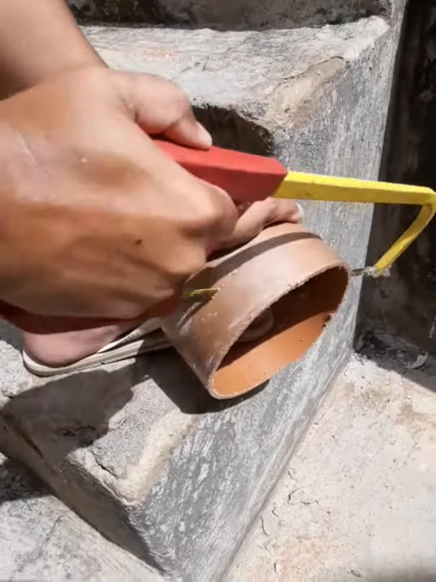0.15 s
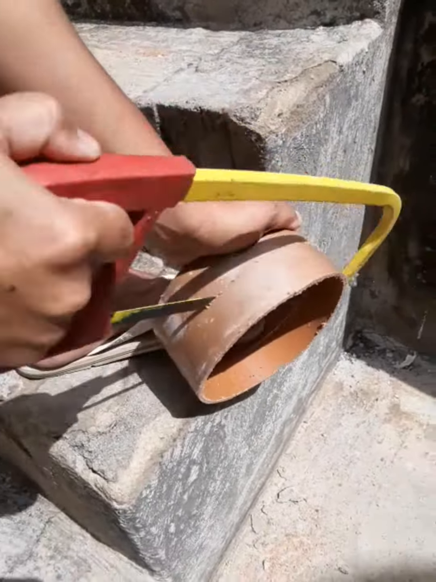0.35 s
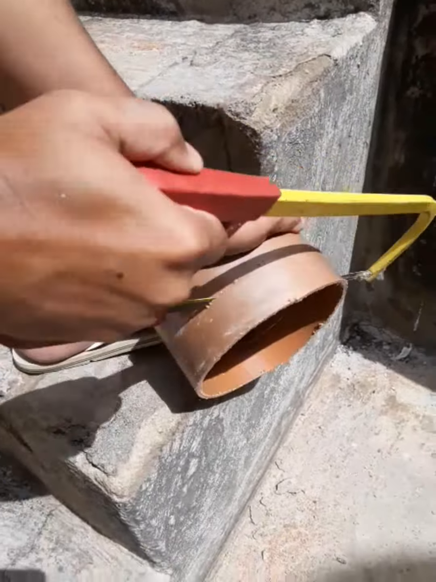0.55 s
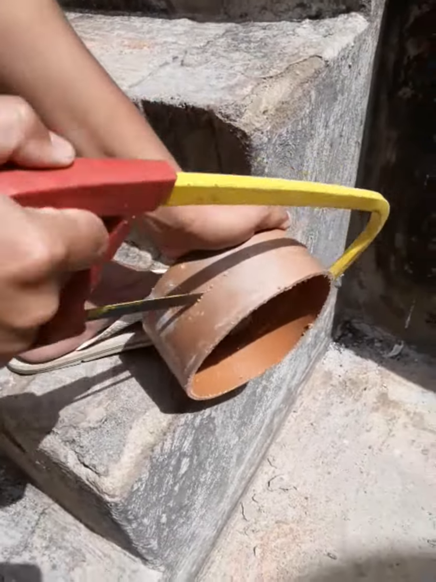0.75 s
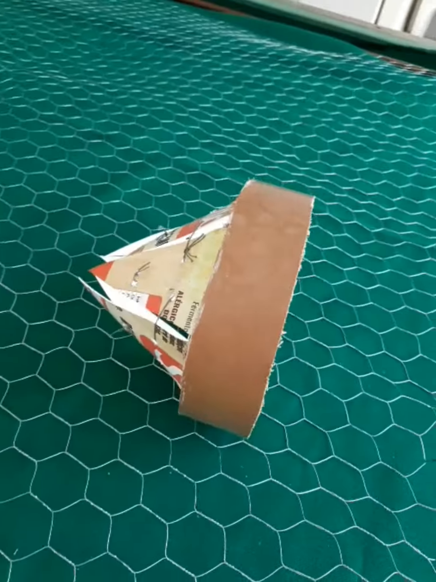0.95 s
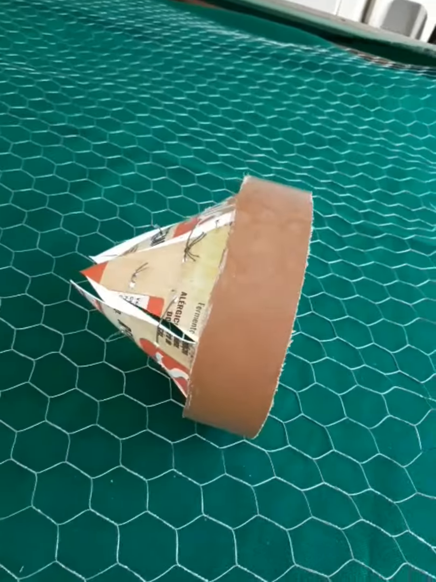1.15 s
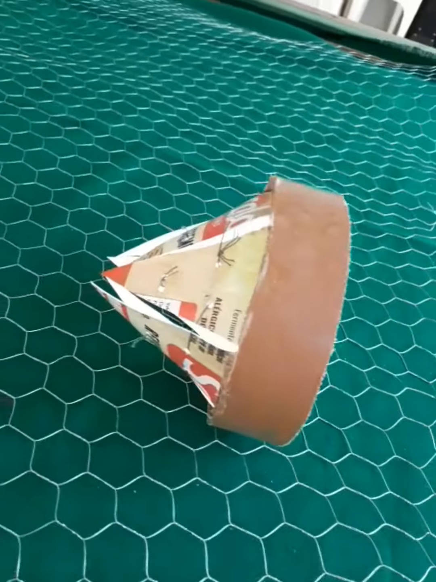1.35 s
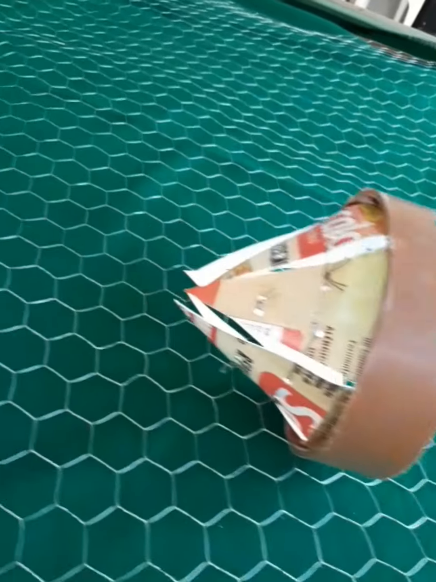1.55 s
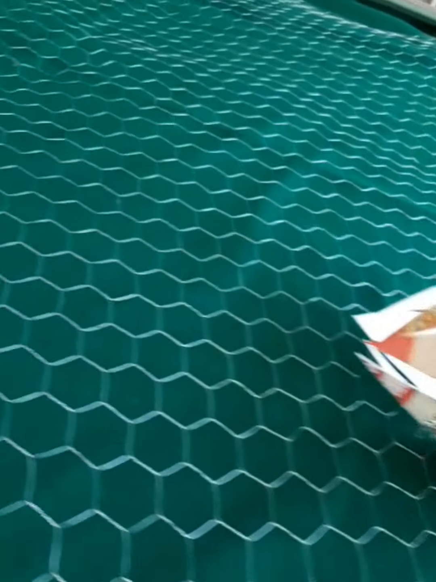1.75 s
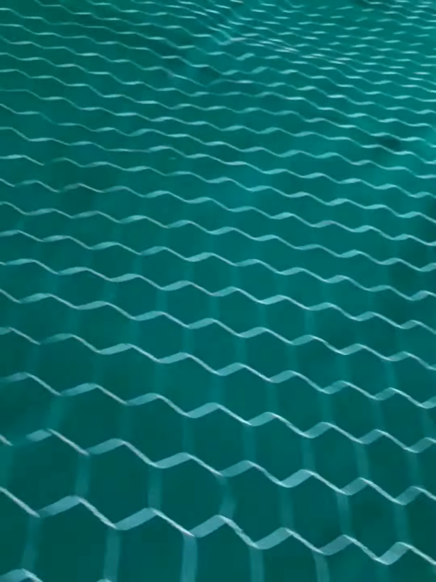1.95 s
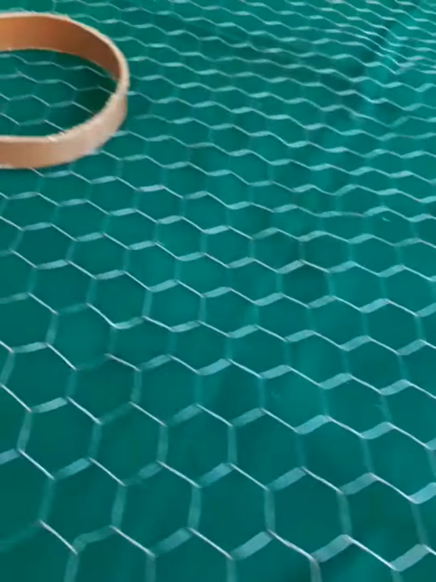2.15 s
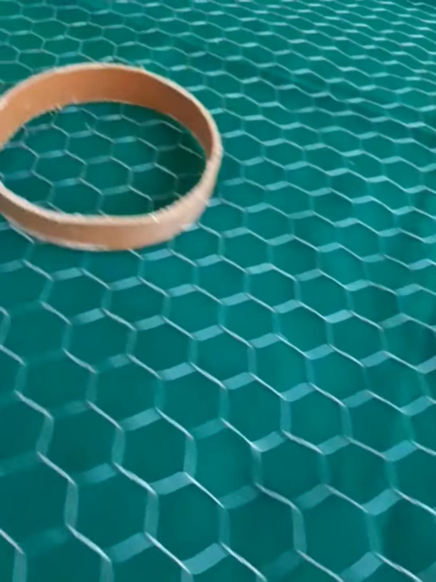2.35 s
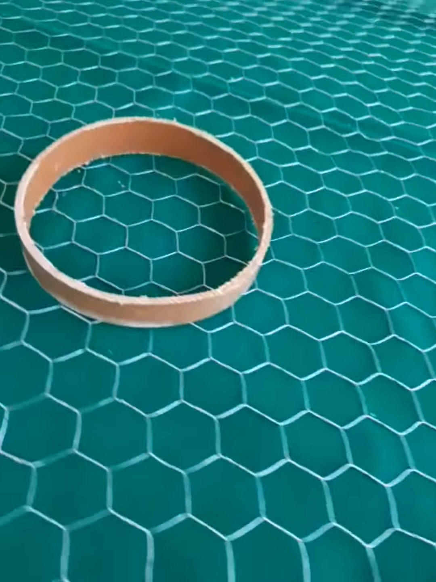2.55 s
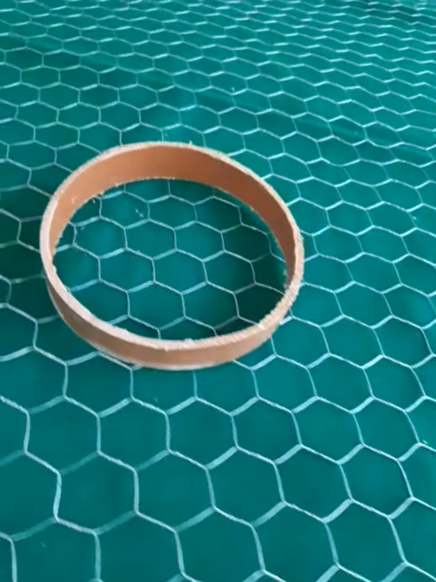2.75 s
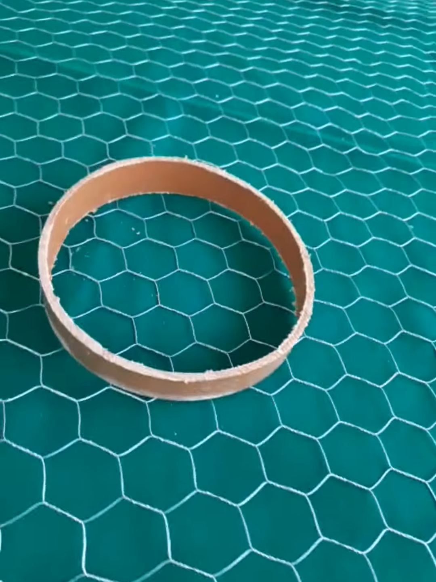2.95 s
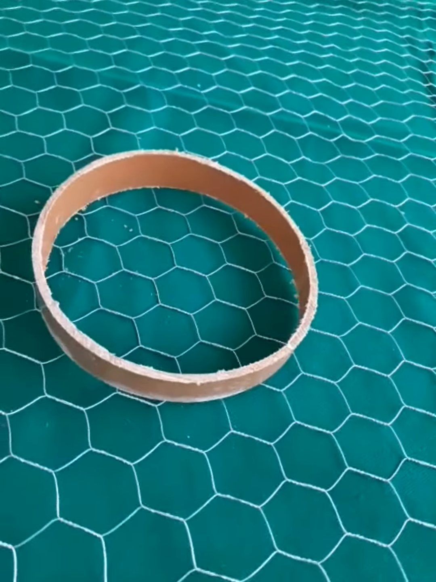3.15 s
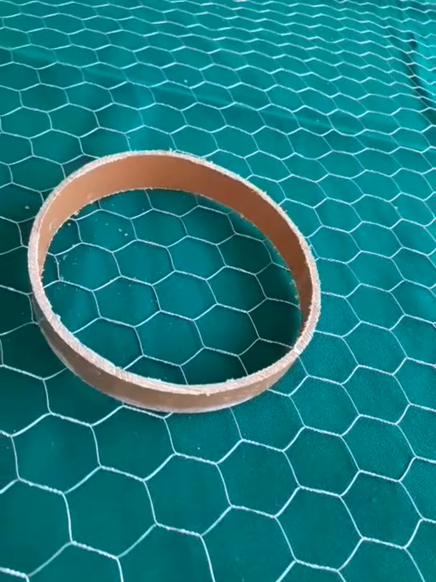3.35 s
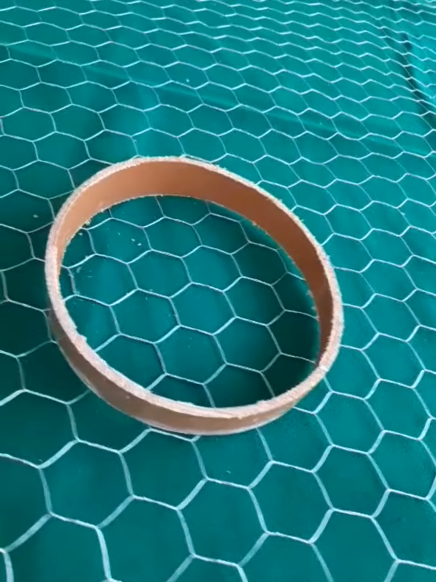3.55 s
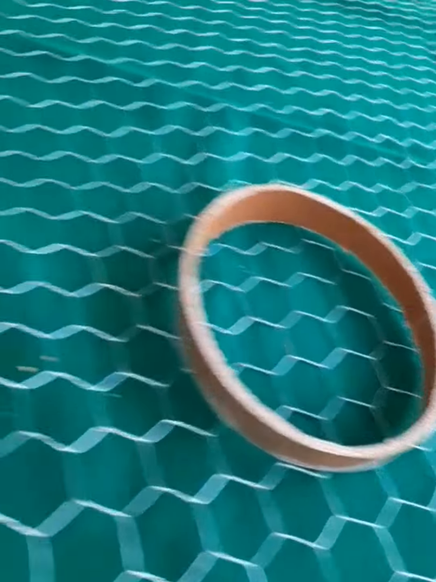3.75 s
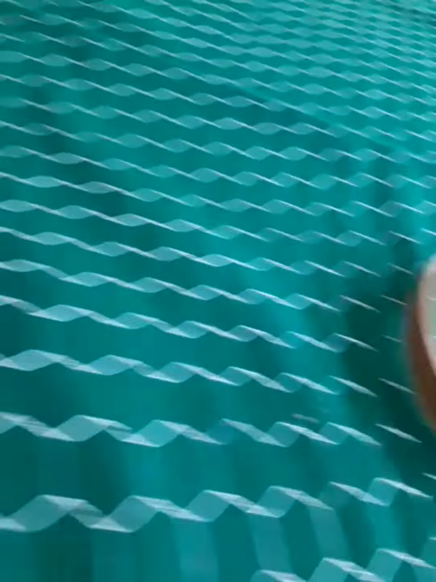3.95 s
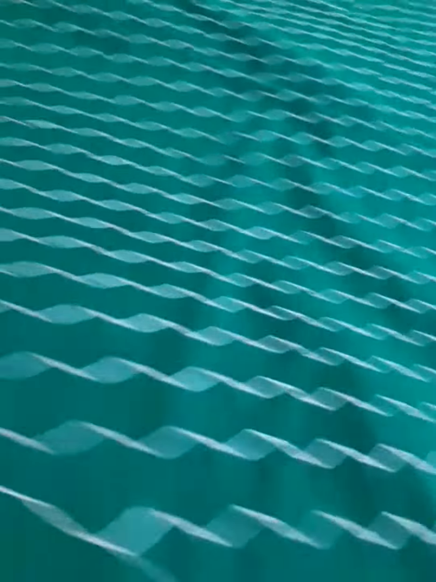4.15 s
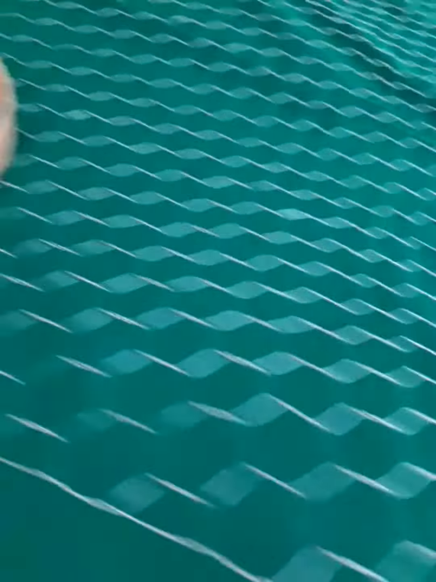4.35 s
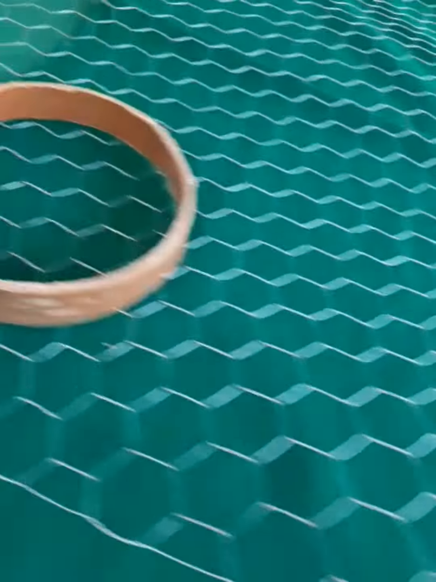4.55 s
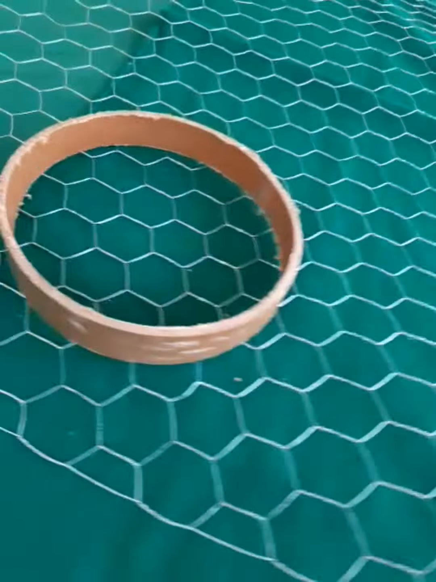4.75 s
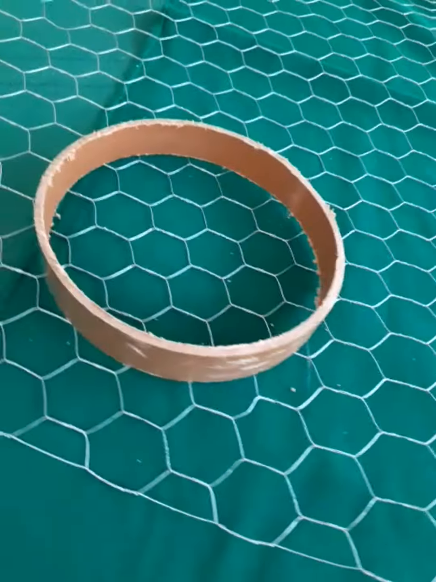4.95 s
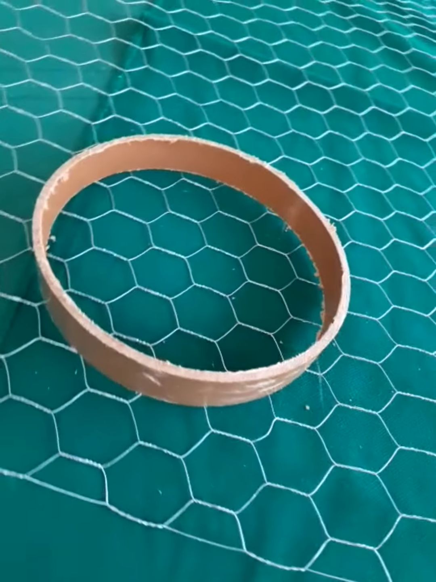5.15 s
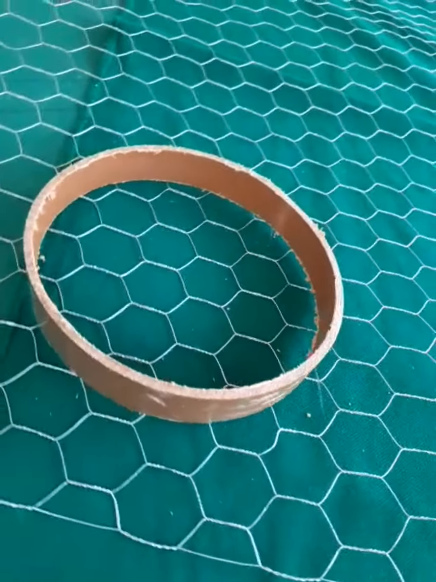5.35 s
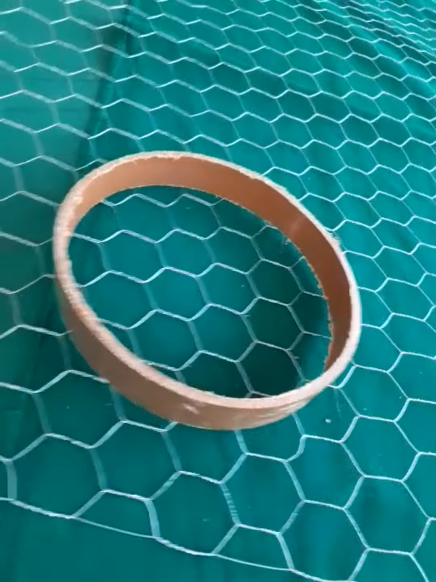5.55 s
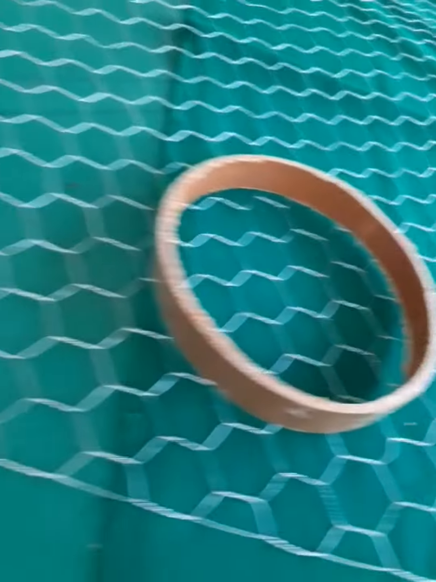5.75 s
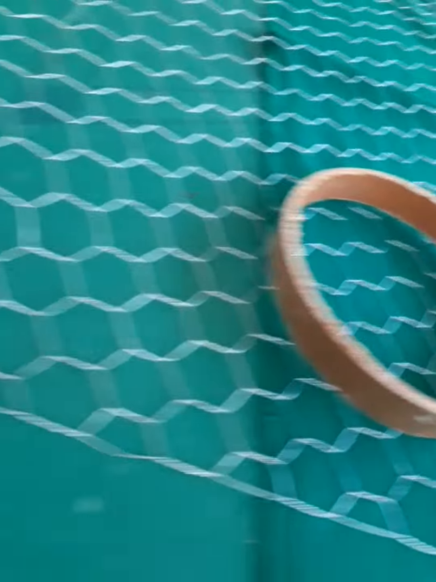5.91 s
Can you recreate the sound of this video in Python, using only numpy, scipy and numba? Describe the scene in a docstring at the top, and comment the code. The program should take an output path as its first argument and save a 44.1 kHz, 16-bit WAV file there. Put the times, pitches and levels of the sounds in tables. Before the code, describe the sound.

A hand hacksaw cuts a plastic pipe close to the microphone outdoors: three quick, ringing rasps that rise and fall in pitch, with soft puffs of wind. After a split second of silence the sawing continues, quieter and further off in an echoing yard, in steady strokes. A low coo throbs beneath it. The saw pauses, a small bird chirps faintly, and the sawing starts again. A soft rumble lies underneath.

```python
"""First you hear a hacksaw cutting a short plastic pipe, close by and outdoors. After a brief silence the
sawing goes on further off in an echoing yard, with a pause. The teeth strike the pipe and make pipe and
blade ring; the faster the blade moves, the higher the note. Wind stirs around the close sawing, a low coo
throbs and a small bird chirps in the yard, and a soft rumble lies under both."""
import sys
import numpy as np
from scipy import signal
from scipy.fft import rfft, irfft
from scipy.io import wavfile
from scipy.ndimage import uniform_filter1d
from numba import njit

SR = 44100
rng = np.random.default_rng(int(sys.argv[2]) if len(sys.argv) > 2 else 0)


def log_audio(samples):
    """Write samples as a 16-bit WAV file to the path given in sys.argv[1]."""
    # one column per channel
    frames = np.atleast_2d(samples).T
    # limit to full scale, then quantise
    limited = np.clip(frames, -1, 1)
    pcm = np.round(limited * 32767).astype(np.int16)
    wavfile.write(sys.argv[1], SR, pcm)


N = 268128

# Blade speed, one list for each close push. Each row: time in seconds, teeth striking per second.
PUSH_SPEEDS = [
    [(0, 767.5), (.015, 1033), (.032, 1289), (.052, 1349), (.066, 1164), (.082, 840), (.1, 597)],
    [(.365, 480), (.39, 741.5), (.408, 1065), (.424, 1253), (.446, 1284), (.46, 1038), (.48, 657)],
    [(.784, 636), (.81, 920), (.83, 1190), (.85, 1345), (.864, 1201), (.878, 1040)],
]
# Each close push at full speed. Each row: tooth note in dB, overtones against the rasp in dB.
PUSH_TONES = [(-24, -4), (-22.5, -9), (-25.5, -4)]
# Close strokes, loud pushes and light pulls. Each row: start, rise and hold in seconds, peak and swell
# in dB, fade in dB per second, high hiss and knock in dB, fade of the ringing in dB per second.
NEAR_STROKES = [(0, 0.058, 0.028, -16.5, 5, 700, -20.5, -48.5, 132),
                (0.168, 0.042, 0.015, -27.5, 8.5, 350, -22.5, -44.5, 151),
                (0.243, 0.019, .006, -24, 9, 282, -22.5, -44.5, 169),
                (.361, 0.073, 0.033, -15.5, 15, 800, -20, -43.5, 126),
                (0.579, 0.08, 0.0055, -25.5, 6, 302, -21, -46, 194),
                (0.777, 0.093, .02, -18, 7.5, 405, -18.5, -52, 150)]
# Far strokes. Each row: start, rise and hold in seconds, peak and swell in dB, fade in dB per second,
# middle of the pull back in seconds, its level in dB, teeth per second, tooth note and second harmonic
# in dB, blade ring in Hz, blade ring in dB, third harmonic in dB, high hiss in dB.
FAR_STROKES = [(0.925, 0.0025, 0.0089, -60, 1, 60, 1.03, -62, 1230, 14, -14, 3250, 1, -15, -22),
               (1.031, 0.067, 0.009, -34.5, 15, 125, 1.3, -51.5, 1380, 3, -12, 3320, 7.5, -16, -19),
               (1.419, 0.051, .01, -36, 12, 111, 1.72, -49, 1286, -0.5, -26, 3130, -3, -24, -20),
               (1.816, 0.063, 0.029, -34.5, 13, 103, 2.05, -52, 1457, 3, -18, 3260, 4, -9, -20.5),
               (2.211, 0.071, 0.027, -38.5, 14, 152, 2.53, -48.5, 1416, -8, -15, 3160, 1, 0.5, -21),
               (2.602, 0.078, 0.0036, -32, 13.5, 113, 2.85, -48, 1483, 1, -13, 3240, 2, -13, -19.5),
               (2.998, 0.053, 0.026, -34.5, 10, 99, 3.24, -53.5, 1360, 3.5, -9, 3280, -4, -2, -21),
               (3.347, 0.099, 0.0057, -32, 20, 106, 3.65, -50, 1380, 0.5, -30, 3200, -1.5, -8, -20.5),
               (3.727, 0.071, 0.024, -32.5, 20, 100, 3.97, -47.5, 1398, -0.5, -18, 3300, -21, 0, -21.5),
               (4.095, 0.089, 0.0068, -33.5, 15.5, 116, 4.42, -58, 1010, -6.5, -36, 3130, -3, -3, -19),
               (4.514, 0.015, .06, -61, 2, 58.5, 3.9, -73, 1450, -18, -21, 3200, -12, -5.5, -10.5),
               (4.693, .03, 0.0092, -52.5, 8, 181, 4.9, -78.5, 1390, -22, -12, 3140, 15, -7, -13),
               (5.213, 0.013, .02, -62, 8, 42, 5.32, -75, 1480, -15, -11, 3180, -5, -12, -10),
               (5.352, .012, .02, -53.5, 8, 46, 5.57, -61.5, 1480, -13, -13, 3230, -12, -10, -24),
               (5.677, 0.038, 0.067, -40, 8, 105, 5.93, -50, 1140, -7.5, -6, 3280, -2, -15, -24),
               (6.058, .03, .01, -50, 7, 100, 6.2, -60, 1310, 5, 1, 3230, -3, -10, -21)]
# Overtones of the close tooth note. Each row: multiple of the tooth rate, level in dB.
NEAR_OVERTONES = [(2, -1.5), (3, -6.5), (4, -6.0), (5, -1.0), (6, -9.0)]
# The far tooth note and its overtones. Each row: multiple of the tooth rate, band width in Hz.
FAR_BANDS = [(1, 270), (2, 330), (3, 480)]
# Where pipe and blade like to ring. Each row: pitch in Hz, width in Hz, relative strength in dB.
NEAR_RESONANCES = [(661, 200, -16), (1043, 130, -3.5), (1190, 200, -4), (1640, 220, -4), (2203, 220, -12),
                   (2864, 250, 3.5), (3120, 460, -4.5), (3423, 73, -6.5), (4044, 770, -3), (5140, 210, -3),
                   (6440, 1100, -17.5)]
FAR_RESONANCES = [(933, 2750, -3), (2010, 103, -4), (2782, 1050, -6), (4318, 260, 2), (4640, 820, -3),
                  (6920, 2100, -1)]
# Tone colour of the rasp and of its high hiss. Each row: frequency in Hz, relative level in dB.
NEAR_RASP_COLOUR = [(240, -50.5), (400, -28.5), (663, -10.5), (884, -9.5), (1100, -9), (2430, -12),
                    (3030, 3), (3770, -10), (6330, -5), (10500, -37.5), (13600, -63), (22000, -120)]
FAR_RASP_COLOUR = [(260, -5), (450, -21), (885, -11.5), (1510, -2), (2390, -14.5), (3250, 0.5), (7080, -22),
                   (9500, -25), (12400, -37), (20900, -120)]
HISS_COLOUR = [(5000, -37), (8500, -23.5), (9320, -21), (10800, -2), (11700, -3.5), (15100, 0.5),
               (16000, -4.5)]
# The blade snags on its way back. Each row: start in seconds, level in dB, ring time in seconds.
SNAGS = [(0.246, -29, 0.0079), (0.264, -33, 0.0049), (0.27, -27, 0.0057), (0.301, -22, 0.0039),
         (.325, -33, 0.004), (0.359, -33, 0.0063), (0.521, -49, 0.0034), (0.576, -44, 0.012),
         (0.653, -43, 0.005), (0.667, -28.5, 0.021)]
# Groans of the pipe. Each row: start in seconds, level in dB, pitch in Hz, length in seconds.
GROANS = [(1.09, -45.5, 385, 0.14), (1.46, -48.5, 311, 0.12), (1.53, -46.5, 250.6, 0.073),
          (1.9, -42.5, 300, 0.052), (1.92, -42, 414, 0.047), (1.98, -47, 249, 0.056),
          (2.66, -48.5, 392, 0.15), (3.07, -49.5, 337, 0.066), (3.43, -40, 395, 0.073),
          (3.5, -48, 341.5, 0.14), (3.55, -52, 420.5, 0.18), (3.8, -37.5, 375, 0.15),
          (4.17, -40.5, 306, 0.17), (4.2, -46, 241, 0.17)]
# Throbs of the coo. Each row: start in seconds, level in dB.
COO_THROBS = [(2.51, -45.5), (2.64, -42), (2.72, -43), (2.839, -43), (2.94, -54), (3.04, -37.5),
              (3.1, -43.5), (3.19, -42), (3.31, -44), (3.42, -38), (3.51, -47), (3.6, -40), (3.681, -41),
              (3.77, -40.5), (3.86, -37.5), (3.97, -40), (4.08, -44)]
# Bird chirps. Each row: start in seconds, level in dB, pitch in Hz, width in Hz, length in seconds.
CHIRPS = [(4.38, -63, 7040, 595, 0.21), (4.41, -59, 4700, 250, 0.15), (4.39, -54.5, 2600, 200, 0.13),
          (4.71, -57.5, 6770, 403, 0.079), (4.82, -63, 7630, 705, 0.11), (5.052, -71, 5070, 201.4, .05)]
# Gusts of wind. Each row: start in seconds, level in dB, length in seconds.
GUSTS = [(.17, -48, .06), (0.302, -42, 0.084), (0.487, -33.5, 0.076), (.63, -42, 0.062),
         (0.736, -48, 0.067)]
# The rumble, one list for each place. Each row: time in seconds, relative level in dB.
RUMBLE_LEVELS = [
    [(0.0, -46), (0.46, -62.5), (0.878, -61)],
    [(0.94, -63), (1.2, -55.5), (2.5, -57), (3.86, -55.5), (4.23, -54.5), (4.4, -69.5), (5.2, -75.5),
     (5.7, -62.5), (5.85, -56), (6.08, -58.5)],
]
# Tone colour of the rumble and of the yard's air. Each row: frequency in Hz, relative level in dB.
RUMBLE_COLOUR = [(15, -63.5), (25, -33), (75, -28.5), (98, -8), (210, 1), (271, -2), (377, -4.5),
                 (465, -10), (900, -13), (1170, -38.5), (1980, -120)]
AIR_COLOUR = [(15, -43), (25, -14), (206, -9.5), (249, -8.5), (1890, -21.5), (2410, -18), (3610, -20),
              (4990, -19.5), (5410, -20.5), (16000, -41.5)]

NEAR_END_S, FAR_START_S, CUT_S = .875, .941, .005
FULL_SPEED_HZ, DB_PER_OCTAVE = 1300, 11  # the tooth note and its overtones sink as the blade slows
WALL_HZ, WALL_DB = 1240, -0.5  # the pipe wall answers the note as it slides past
RING_ON_DB, RESTING_DB = -13.5, -41.5  # the pipe rings on after a stroke; the blade never quite rests
BRAKE_S, BRAKE_HISS_DB, BRAKE_KNOCK_DB = 0.018, 3.5, -37  # braking adds hiss and a hollow knock
SNAG_HISS_DB, PULL_HISS_DB, STEADY_HISS_DB = -24.5, -0.5, -80
HISS_PEAKING = 0.36  # the hiss gathers at the top of a far push
PULL_S = 0.12  # half the length of a far pull back
ECHO_S, ECHO_DB = 0.34, -8.5  # the echo takes ECHO_S to fade by 60 dB
COO_HZ, THROB_S = 205, 0.059
AIR_DB, TOP_HZ = -65, 15900


def saw_near():
    """The striking teeth sing a note over a rasp, and ring the pipe and blade."""
    t = np.arange(N) / SR
    tooth_hz = curves(PUSH_SPEEDS)[0]
    pushing = sum((t > push[0][0]) * (t <= push[-1][0]) for push in PUSH_SPEEDS)
    cutting = uniform_filter1d(pushing * 1., size=200)
    braking = sum(np.exp(-((t - push[-1][0] + BRAKE_S / 2) / BRAKE_S) ** 2) for push in PUSH_SPEEDS)
    strokes = [stroke(*row[:6]) for row in NEAR_STROKES]
    ringing = [stroke(start, rise, hold, peak_db + RING_ON_DB, swell_db, ring_fade)
               for start, rise, hold, peak_db, swell_db, *_, ring_fade in NEAR_STROKES]
    level = power_sum(strokes + ringing + [undb(RESTING_DB)])
    hiss_db, knock_db = per_stroke(NEAR_STROKES)[6:8]
    phase = 2 * np.pi * np.cumsum(tooth_hz * (1 + .02 * wander(400))) / SR
    note, overtones = tooth_note(phase, tooth_hz, cutting)
    tear = tearing(phase, bite=.5 * cutting, patchy_db=2.04, grit_db=1.0)
    hiss = colour(tear, HISS_COLOUR)
    rasp = pipe_and_blade(tear + overtones, NEAR_RESONANCES) + undb(-3.5) * colour(tear, NEAR_RASP_COLOUR)
    rasp = 0.71 * rasp + undb(hiss_db + BRAKE_HISS_DB * braking) * hiss
    snags = sum(undb(db) * swell(start, ring, rise=0.058) for start, db, ring in SNAGS)
    knock = pipe_knock() * (undb(knock_db) + undb(BRAKE_KNOCK_DB) * braking)
    return note + (level + snags) * rasp + undb(SNAG_HISS_DB) * snags * hiss + knock


def saw_far():
    """Echoes blur the tooth note, its overtones and the blade's ring, so each is a band of noise."""
    t = np.arange(N) / SR
    push = power_sum([stroke(*row[:6], bite_s=0.013) for row in FAR_STROKES])
    pull = power_sum([undb(row[7]) * np.exp(-((t - row[6]) / PULL_S) ** 2) for row in FAR_STROKES])
    level = power_sum([push, pull, 1e-6])
    settings = per_stroke(FAR_STROKES)
    peak_db = settings[3]
    tooth_hz, note_db, second_db, blade_hz, blade_db, third_db, hiss_db = settings[8:]
    tear = tearing(phase=0, bite=0, patchy_db=1.0, grit_db=1.25)
    note, second, third = (unit(band(band(tear, k * tooth_hz, width), k * tooth_hz, 2 * width))
                           for k, width in FAR_BANDS)
    blade = unit(band(band(tear, blade_hz * (1 + 0.019 * wander(40)), 270), blade_hz, 460))
    teeth = undb(note_db - 5.1) * note + undb(second_db) * second + undb(third_db) * third
    rings = teeth + undb(blade_db - 4.5) * blade
    ring_share = (level / undb(-25.5)) ** 0.51  # light strokes ring less
    rasp = 0.6 * pipe_and_blade(tear, FAR_RESONANCES) + 0.5 * colour(tear, FAR_RASP_COLOUR)
    push_hiss = undb(hiss_db) * push * (push / undb(peak_db)) ** HISS_PEAKING
    hiss_level = power_sum([push_hiss, undb(hiss_db + PULL_HISS_DB) * pull, undb(STEADY_HISS_DB)])
    sawing = level * (rasp + ring_share * rings) + hiss_level * colour(tear, HISS_COLOUR)
    return sawing * (t > FAR_START_S)


def tooth_note(phase, tooth_hz, cutting):
    """Evenly spaced teeth make a note and overtones, louder as the blade speeds up."""
    speed_db = DB_PER_OCTAVE * np.log2(tooth_hz / FULL_SPEED_HZ)
    pushes = [(push[0][0], *levels) for push, levels in zip(PUSH_SPEEDS, PUSH_TONES)]
    note_db, overtone_db = per_stroke(pushes)[1:]
    note = cutting * undb(note_db + speed_db + 2.5 + 1.9 * wander(150)) * np.sin(phase)
    note = note + undb(WALL_DB) * band(note, WALL_HZ, 120)
    overtones = sum(undb(db + 2.6 * wander(150)) * np.cos(k * phase) for k, db in NEAR_OVERTONES)
    # the pipe wall gives off the overtones best once they climb past its dull range
    overtones = 1.35 * band(overtones, 3600, 4500) * undb(overtone_db + speed_db)
    return note, cutting * overtones


def tearing(phase, bite, patchy_db, grit_db):
    """Plastic tears unevenly and throws off hard grains; bite makes the noise puff once a tooth."""
    grit = undb(grit_db * uniform_filter1d(rng.exponential(size=N) - 1, size=24) * np.sqrt(24))
    puffs = rng.standard_normal(N) * (1 + bite * np.cos(phase))
    return unit(puffs * undb(patchy_db * wander(200)) * grit)


def pipe_and_blade(rubbing, resonances):
    """The rubbed pipe and blade ring at their own pitches."""
    return unit(sum((-1) ** k * undb(db) * np.sqrt(100 / width) * band(rubbing, hz, width)
                    for k, (hz, width, db) in enumerate(resonances)))


def pipe_knock():
    """The hollow sound of the knocked pipe: two low bands of noise."""
    return unit(band(rng.standard_normal(N), 200, 100) + 0.48 * band(rng.standard_normal(N), 600, 200))


def pipe_groans():
    """The pipe groans under some of the far strokes."""
    return rough_tones(GROANS, waver=.045, rise=.15)


def with_yard_echo(sound):
    """The yard throws the sound back, adding a short fading tail."""
    delay = np.arange(SR // 2) / SR
    tail = band(rng.standard_normal(N), 1800, 5700)[:len(delay)] * undb(-60 * delay / ECHO_S)
    return sound + undb(ECHO_DB) * signal.fftconvolve(sound, tail / np.sqrt(np.sum(tail ** 2)))[:N]


def coo():
    """A low tone in short throbs that run into each other."""
    return rough_tones([(start, db, COO_HZ, THROB_S) for start, db in COO_THROBS], waver=.03, rise=.35)


def bird():
    """Chirps, smeared by echoes into narrow bands of noise that swell and fade."""
    noise = rng.standard_normal(N)
    return sum(undb(db) * unit(band(band(noise, hz, width), hz, width)) * swell(start, length, rise=.15)
               for start, db, hz, width, length in CHIRPS)


def wind():
    """Gusts hit the microphone with deep, soft puffs."""
    gusts = sum(undb(db) * swell(start, length, rise=0.45) for start, db, length in GUSTS)
    return gusts * unit(band(band(rng.standard_normal(N), 97, 70), 75, 100))


def rumble():
    """The surroundings make a low noise whose level drifts."""
    level = undb(curves(RUMBLE_LEVELS)[0] + 2.5 + 2.3 * wander(10))
    return level * colour(rng.standard_normal(N), RUMBLE_COLOUR)


def yard_air():
    """A faint, steady hush fills the yard."""
    return undb(AIR_DB) * colour(rng.standard_normal(N), AIR_COLOUR)


def stroke(start, rise, hold, peak_db, swell_db, fade, bite_s=0.0027):
    """Loudness of one stroke: the blade bites, swells to its peak, holds and fades."""
    t = np.arange(N) / SR - start
    db = peak_db - swell_db * np.clip(1 - t / rise, 0, 1) - fade * np.maximum(t - rise - hold, 0)
    return undb(db) * np.clip(t / bite_s, 0, 1)


def per_stroke(rows):
    """Hold each stroke's values until the next one starts, smoothing the steps."""
    rows = np.array(rows)
    current = np.maximum(np.searchsorted(rows[:, 0], np.arange(N) / SR) - 1, 0)
    return uniform_filter1d(rows[current].T, size=400)


def swell(start, length, rise):
    """Loudness that rises over a share of its length, then fades."""
    progress = np.maximum(np.arange(N) / SR - start, 0) / length
    return np.minimum(progress / rise, 1) * np.exp(-1.5 * progress ** 2)


def rough_tones(rows, waver, rise):
    """Tones that swell and fade, a little unsteady in pitch and loudness."""
    wobbly_time = np.cumsum(1 + waver * wander(150)) / SR
    roughness = undb(1.5 * wander(50))
    return roughness * sum(undb(db) * swell(start, length, rise) * np.sin(2 * np.pi * hz * wobbly_time)
                           for start, db, hz, length in rows)


def wander(rate):
    """A smooth random wobble of size about 1, with rate new values a second."""
    hold = int(SR / rate)
    steps = np.repeat(rng.standard_normal(N // hold + 1), hold)
    return unit(uniform_filter1d(uniform_filter1d(steps, hold), hold)[:N])


def curves(tables):
    """Join timed tables and draw straight lines between their rows, one value a sample."""
    times, *columns = np.vstack(tables).T
    return [np.interp(np.arange(N) / SR, times, column) for column in columns]


def colour(x, points):
    """Shape a sound's lows and highs along (Hz, dB) points, then scale it to level 1."""
    hz, db = np.transpose(points)
    freqs = np.maximum(np.arange(N // 2 + 1) * SR / N, 1)
    gain = undb(np.interp(np.log(freqs), np.log(hz), db, left=-90, right=-90))
    return unit(irfft(rfft(x) * gain, N))


def band(x, hz, width):
    """Keep the sound near one pitch, which may be steady or moving."""
    return moving_band(x, hz + np.zeros(N), 1. * width)


@njit
def moving_band(x, hz, width):
    """A state-variable band-pass filter: the centre pitch passes at full strength."""
    y, band_state, low_state = np.empty(len(x)), 0., 0.
    for i in range(len(x)):
        tuning, damping = np.tan(np.pi * hz[i] / SR), width / hz[i]
        passed = (band_state + tuning * (x[i] - low_state)) / (1 + tuning * (tuning + damping))
        band_state = 2 * passed - band_state
        low_state += 2 * tuning * passed
        y[i] = damping * passed
    return y


def power_sum(parts):
    """Level of unrelated sounds heard together."""
    return np.sqrt(sum(part ** 2 for part in parts))


def undb(db):
    """Turn decibels into a number to multiply by."""
    return 10 ** (np.asarray(db) / 20)


def unit(x):
    """Scale to an average (rms) level of 1."""
    return x / np.sqrt(np.mean(x ** 2))


def scene():
    """The close sawing, a short silence, then the yard."""
    t = np.arange(N) / SR
    faint_tail = 0.041 * (t > NEAR_END_S) * undb(-3000 * np.abs(t - NEAR_END_S))
    near_on = np.clip((NEAR_END_S - t) / CUT_S, 0, 1) + faint_tail
    far_on = np.clip((t - FAR_START_S) / 0.00084, 0, 1)
    low_rumble, gusts, air = rumble(), wind(), yard_air()
    near = saw_near() + low_rumble + gusts
    far = with_yard_echo(saw_far()) + pipe_groans() + coo() + bird() + low_rumble + air
    return (near_on * near + far_on * far)[None]


def record(dry):
    """The phone rounds the loudest peaks, cuts the highest treble and sits slightly off zero."""
    rounded = np.tanh(1.3 * dry) / 1.313
    treble_cut = signal.ellip(14, .2, 80, TOP_HZ, fs=SR, output="sos")
    return signal.sosfilt(treble_cut, rounded) - .0006


dry = scene()
out = record(dry)
log_audio(out)
```